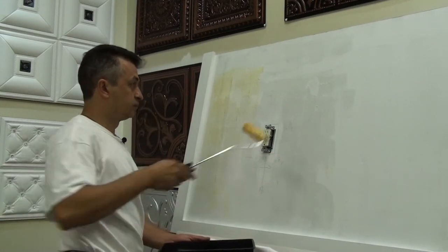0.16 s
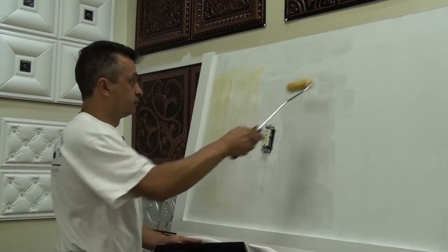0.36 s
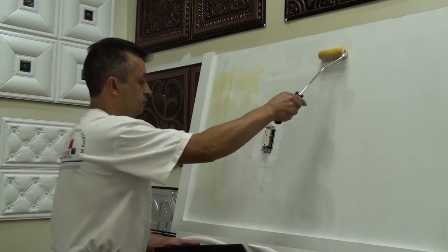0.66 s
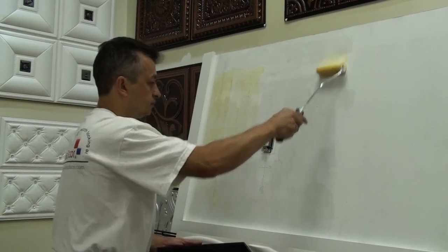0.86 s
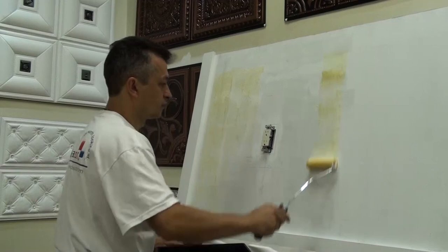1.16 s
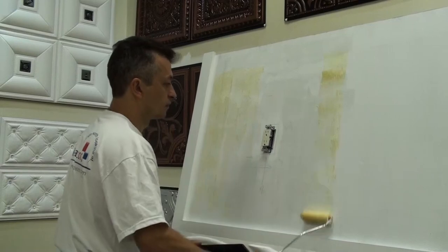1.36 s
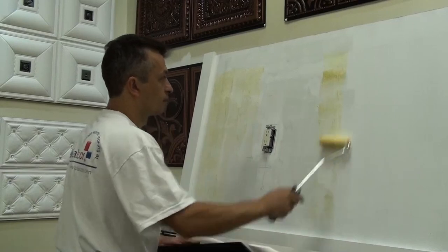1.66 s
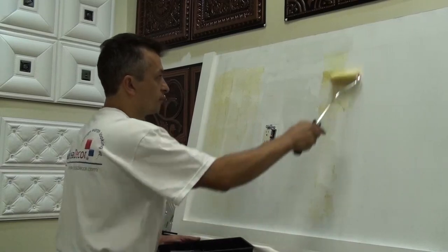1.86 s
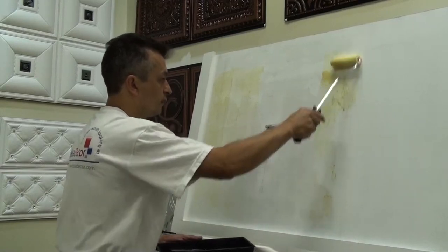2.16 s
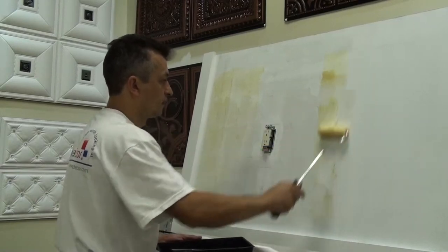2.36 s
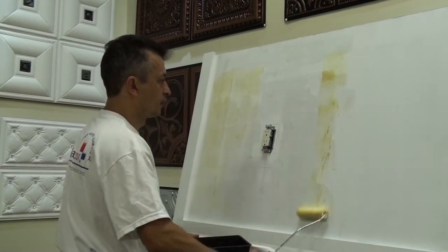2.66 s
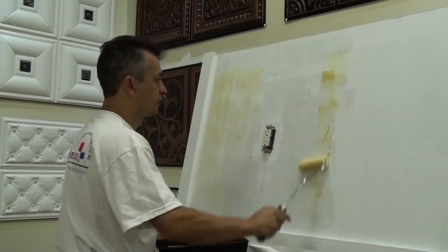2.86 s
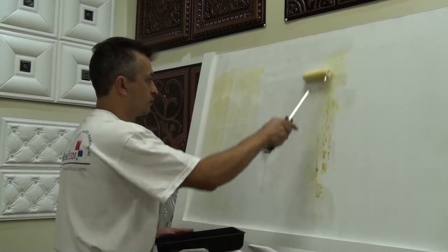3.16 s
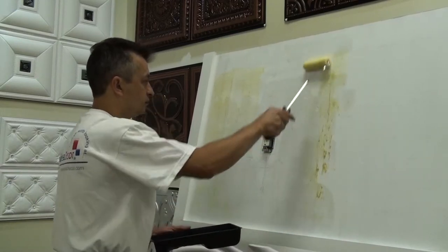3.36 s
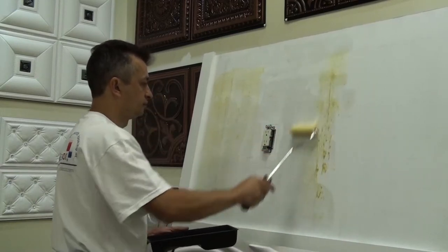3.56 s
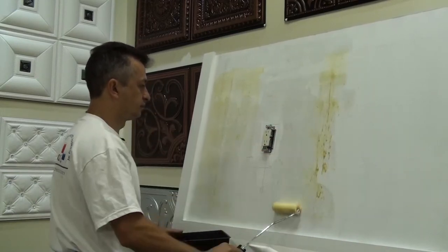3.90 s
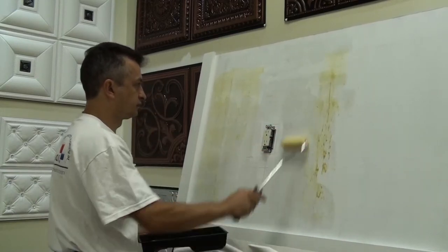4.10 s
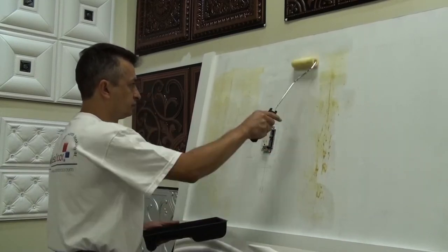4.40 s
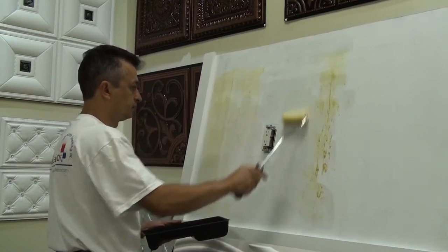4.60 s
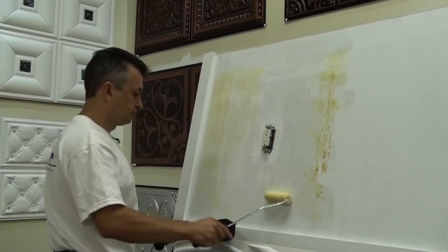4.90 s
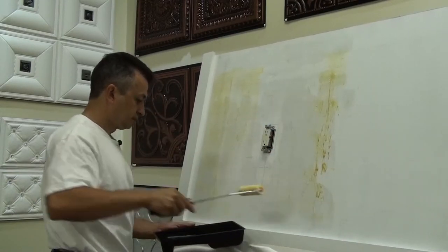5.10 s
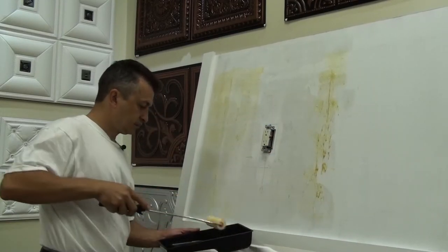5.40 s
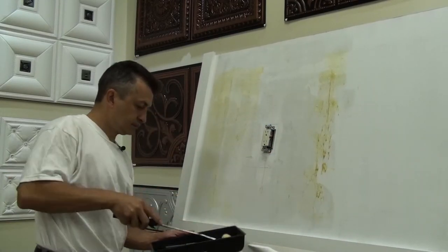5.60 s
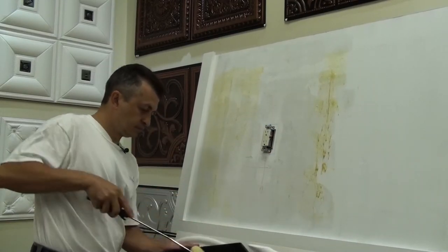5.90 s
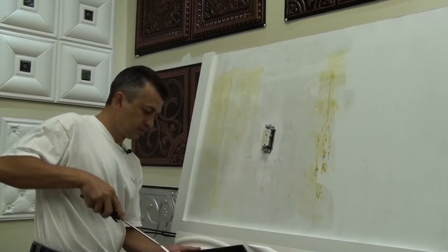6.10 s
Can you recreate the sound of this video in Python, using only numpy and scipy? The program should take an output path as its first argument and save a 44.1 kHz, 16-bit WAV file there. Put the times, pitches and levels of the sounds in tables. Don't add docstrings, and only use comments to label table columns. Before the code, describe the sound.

A foam roller spreads tacky glue up and down a hollow wall board, hissing, rattling and ticking, then knocks its tray over a low hum.

```python
import sys
import numpy as np
from scipy import signal
from scipy.fft import rfft, irfft
from scipy.io import wavfile

SR = 44100
rng = np.random.default_rng(int(sys.argv[2]) if len(sys.argv) > 2 else 0)


def amplitude_ratio(level_db):
    exponent = np.asarray(level_db, float) / 20
    return 10 ** exponent


def materialize(psi):
    bounded = np.clip(np.atleast_2d(psi).T, -1, 1)
    quanta = np.round(bounded * 32767).astype(np.int16)
    wavfile.write(sys.argv[1], SR, quanta)


N = 275625

# (f/Hz, width/Hz, level/dB)
BOARD = [(105.1, 6.3, -0.5), (141, 21, -1), (177, 25, -0.5), (206.2, 10.4, -6), (235, 36, -8),
         (297.8, 4, -20), (393, 44, -12), (458, 51, -20.5)]
# (t/s, board level/dB, core level/dB, rub level/dB, dying/(dB/s))
BUMPS = [(0.749, -50.5, -68, -93, 153.5), (1.014, -46, -46.5, -55, 106), (1.178, -66, -66, -75, 105),
         (1.762, -31.5, -43, -40.5, 124), (1.946, -37, -54, -59, 37), (2.341, -39, -47, -67, 94),
         (2.888, -39, -68, -45.5, 87), (3.0, -38, -48, -74, 71), (3.223, -40, -45, -67, 95),
         (3.463, -42.5, -46, -78, 80), (3.85, -39.5, -52, -59, 96), (4.191, -57, -44.5, -64, 140),
         (4.79, -41.5, -50.5, -48, 121), (4.996, -42.5, -50, -61.5, 197), (5.148, -37.5, -56.5, -58, 67)]
# (t/s, rattle level/dB, rub level/dB, dying/(dB/s))
TRAY = [
    (5.664, -66, -76, 280),
    (5.914, -89, -79, 500),
    (6.062, -82, -78, 348),
    (6.144, -72, -75, 500),
    (6.185, -59, -55, 402),
]


def rms_one(x):
    return x / np.sqrt(np.mean(x ** 2) + 1e-20)


def in_time(rows, outside=None):
    s, *columns = np.transpose(rows)
    return [np.interp(np.arange(N) / SR, s, c, outside, outside) for c in columns]


def drift(rate):
    r = np.exp(-80 * np.pi * rate / SR)
    noise = rng.standard_normal(N // 40 + 2002)
    slow = signal.lfilter([1], [1, -2 * r, r * r], noise)[2000:]
    return np.interp(np.arange(N) / 40, np.arange(len(slow)), rms_one(slow))


def ring(clicks, hz, t60):
    r, w = amplitude_ratio(-60 / (t60 * SR)), 2 * np.pi * hz / SR
    return signal.lfilter([0, np.sin(w)], [1, -2 * r * np.cos(w), r * r], clicks + 1e-18)


def colour(x, spectrum):
    hz, db = np.transpose(spectrum)
    grid = np.arange(1, len(x) // 2 + 2) * SR / len(x)
    gain = amplitude_ratio(np.interp(np.log(grid), np.log(hz), db))
    return rms_one(irfft(rfft(x) * gain, len(x)))


def grains(per_s, spread_db, clump_db, clump_rate):
    born = rng.random(N) < per_s * amplitude_ratio(clump_db * drift(clump_rate)) / SR
    size = amplitude_ratio(spread_db * np.minimum(rng.exponential(1, N), 5))
    return rms_one(born * size * rng.choice([-1, 1], N))


def body(modes, excite, flutter_db, flutter_rate):
    out = 0
    for hz, width, db in modes:
        voice = rms_one(ring(excite(), hz, np.log(1000) / np.pi / width))
        out = out + voice * amplitude_ratio(db + flutter_db * drift(flutter_rate))
    return rms_one(out)


def roller():
    rub, scuff = foam_rub()
    jolt = amplitude_ratio(.9 * drift(30))
    return jolt * (board_drum() + core_rattle() + scuff + ledge(rub + glue_hiss()))


def board_drum():
    law = (-44.5, 0, 1.1, 0.43, -0.33)
    s, db, _, _, dying = np.transpose(BUMPS)
    drum = body(BOARD, lambda: rng.standard_normal(N), flutter_db=2.0, flutter_rate=7)
    return drum * np.hypot(rolling(law), bursts(s, db, dying))


def core_rattle():
    # (f/Hz, width/Hz, level/dB)
    modes = [(780, 35, -39), (1034, 58, -3), (1200, 150, -1), (1400, 120, -1), (1705, 260, 2.5),
             (2100, 410, 0.5), (2900, 540, -10)]
    law = (-48, 0.76, 1.83, -0.52, -0.0463)
    s, _, db, _, dying = np.transpose(BUMPS)
    gain = np.hypot(rolling(law), bursts(s, db, 1.5 * dying))
    s, db, _, dying = np.transpose(TRAY)
    gain = gain + bursts(s, db, dying)
    rattle = body(modes, lambda: grains(900, spread_db=-3.0, clump_db=3.5, clump_rate=30),
                  flutter_db=2.0, flutter_rate=4.5)
    return gain * (0.91 * rattle + 0.58 * pops(500, low_hz=695, high_hz=2590, cycles=29))


def foam_rub():
    # (f/Hz, level/dB per Hz)
    rub_colour = [(1500, -53), (2400, -6), (3000, -5.5), (3600, -3.5), (4600, -6), (6000, -9), (7500, -13),
                  (9500, -12.5)]
    law = (-49, 0.67, 1.71, 1.45, 0.3063)
    s, _, _, db, dying = np.transpose(BUMPS)
    rub_gain = np.hypot(rolling(law), bursts(s, db, 1.74 * dying))
    s, _, db, dying = np.transpose(TRAY)
    scuff_gain = bursts(s, db, dying)
    rub = colour(grains(5000, spread_db=0.0, clump_db=6.0, clump_rate=16), rub_colour)
    rub = patches(rub, (2600, 3500, 4300, 5330, 6400, 7400), patchy_db=2.0, patch_rate=6.7)
    rub = .8 * rub + .55 * pops(600, low_hz=2500, high_hz=6800, cycles=50)
    rub = signal.lfilter(*signal.butter(3, 10500, fs=SR), rub)
    scuff = rms_one(signal.lfilter(*signal.butter(2, [3600, 7500], "band", fs=SR), rub))
    return rub * rub_gain, scuff * scuff_gain


def glue_hiss():
    # (f/Hz, level/dB per Hz)
    glue_colour = [(2940, -27), (5000, -6), (7160, 2.5), (12100, 5.5), (15100, 2), (15800, 0),
                   (16200, -37.5)]
    law = (-48.5, 1.24, 2, 2.3, 0.2462)
    # (t/s, tack level/dB)
    tack = [(.9, 14), (1.0, 10.5), (1.2, 5), (1.26, 1.5), (1.43, 6), (1.56, -1.5), (1.8, 1.5), (2.04, 2),
            (2.24, -4), (2.33, 1), (2.85, 0), (3.3, 0), (3.5, -4.5), (3.9, -4), (4.2, -7), (4.56, -23),
            (4.68, 6), (4.9, -20)]
    gain = rolling(law) * amplitude_ratio(in_time(tack)[0])
    glue = colour(grains(12000, spread_db=4.0, clump_db=2.0, clump_rate=45), glue_colour)
    glue = patches(glue, (6100, 6700, 7600, 10100, 11900, 14000, 16500), patchy_db=1.2, patch_rate=5)
    dull = rms_one(signal.lfilter(*signal.butter(4, 9500, fs=SR), glue))
    dries_from_s, dries_db_per_s = 3.4, 10.5
    dried_db = dries_db_per_s * np.maximum(np.arange(N) / SR - dries_from_s, 0)
    wet = np.clip((20 * np.log10(gain + 1e-9) - dried_db + 73.5) / 14, 0, 1)
    return gain * (wet * glue + (1 - wet) * dull)


def rolling(law):
    # (start/s, end/s, fastest at share of stroke (0-1), speed level/dB, pressure level/dB)
    strokes = [
        (0.796, 1.512, 0.57, -3.5, -2.5),
        (1.517, 2.115, 0.36, 1, 0),
        (2.048, 2.28, 0.57, -15, -5),
        (2.164, 2.776, 0.46, -0.5, 0),
        (2.761, 3.394, 0.39, -1.5, 0),
        (3.38, 4.016, 0.45, 1.5, -1.5),
        (3.986, 4.487, 0.32, -0.5, -1.5),
        (4.487, 5.05, 0.41, -2.5, -3.5),
    ]
    full_db, per_stroke, per_speed, per_pressure, onset = law
    cruise = 1.23
    t, power = np.arange(N) / SR, 0
    for start, end, fastest, speed_db, pressure_db in strokes:
        share = np.clip((t - start) / (end - start), 0, 1) ** (np.log(.5) / np.log(fastest))
        speed = np.tanh(cruise * np.sin(np.pi * share)) / np.tanh(cruise)
        start_up = abs(onset) * (share < .5)
        moving = np.clip((speed - start_up) / (1 - start_up), 0, 1) ** per_speed * (t < end)
        level = amplitude_ratio(full_db + per_stroke * speed_db + per_pressure * pressure_db)
        power = power + (level * moving) ** 2
    return np.sqrt(power)


def bursts(times, peaks_db, dying):
    rise_db_per_s = 707
    since = np.arange(N) / SR - times[:, None]
    slope = np.where(since < 0, rise_db_per_s * since, -dying[:, None] * since)
    return amplitude_ratio((peaks_db[:, None] + slope).max(axis=0))


def patches(x, edges_hz, patchy_db, patch_rate):
    spectrum, grid = rfft(x), np.arange(N // 2 + 1) * SR / N
    out = 0
    for row in np.eye(len(edges_hz)):
        share = np.interp(grid, edges_hz, row)
        out = out + irfft(spectrum * share, N) * amplitude_ratio(patchy_db * drift(patch_rate))
    return rms_one(out)


def pops(per_s, low_hz, high_hz, cycles):
    clicks = grains(per_s, spread_db=1.5, clump_db=4.5, clump_rate=9.8)
    dealt = rng.integers(0, 20, N)
    pitches = np.geomspace(low_hz, high_hz, 20)
    return rms_one(sum(ring(clicks * (dealt == k), hz, cycles / hz) for k, hz in enumerate(pitches)))


def ledge(x):
    # (t/s, lag/ms)
    lags = [(.9, 1.4), (1.22, .23), (1.55, .23), (1.75, .95), (2.05, 1.5), (2.25, 1.5), (2.72, .23),
            (2.82, .35), (3.03, 1.08), (3.2, 1.4), (3.4, 1.55), (3.8, .23), (4.08, .23), (4.42, 1.0),
            (4.55, .8), (4.85, .23)]
    near_db, loss_db_per_ms, cut_hz = -4, 7, 8000
    lag_ms, = in_time(lags)
    dull = signal.filtfilt(*signal.butter(2, cut_hz, fs=SR), x)
    echo = np.interp(np.arange(N) - lag_ms * SR / 1000, np.arange(N), dull)
    return x + amplitude_ratio(near_db - loss_db_per_ms * lag_ms) * echo


def rising_band():
    start_s, length_s, start_hz, rise_hz_per_s, level_db = 4.55, 0.26, 1584, 6600, -54
    since = np.arange(N) / SR - start_s
    hz = (start_hz + rise_hz_per_s * np.clip(since, 0, length_s)) * (1 + .035 * drift(30))
    swell = np.sin(np.pi * np.clip(since / length_s, 0, 1)) ** 0.23 * (since < length_s)
    tone = np.sin(2 * np.pi * np.cumsum(hz) / SR)
    return swell * amplitude_ratio(level_db + 6.2 * drift(49)) * drift(140) * tone


def knocks():
    # (t/s, peak level/dB, low ring f/Hz, high ring level/dB)
    core_knocks = [(0.401, -48.5, 1200, -2), (0.44, -52.5, 960, -19), (0.477, -49.5, 745, -6),
                   (0.493, -51.5, 1040, -5), (0.532, -46, 920, 3), (0.716, -49, 1130, -32),
                   (0.747, -37, 1170, -49), (0.901, -50, 744, -13), (0.943, -44, 800, -13),
                   (0.981, -40, 796, -22), (1.578, -60, 1200, -1), (1.946, -39.5, 1260, -1),
                   (2.105, -52, 1880, 13.5), (2.174, -37, 724, -12), (2.282, -37.5, 1120, -3),
                   (2.982, -32, 1120, 0), (4.126, -32, 1490, -22), (4.175, -38, 1128, -23),
                   (4.313, -29, 1180, -30), (4.42, -42.5, 1010, -35), (4.482, -49.5, 844, -17),
                   (4.564, -30.5, 1080, -30), (4.646, -27, 1095, -8), (4.715, -31, 1090, -12)]
    # (t/s, peak level/dB, low ring f/Hz, high ring level/dB, high ring f/Hz)
    tray_knocks = [(4.988, -31.5, 1530, -10, 4000), (5.005, -32.5, 1220, -11, 3900),
                   (5.193, -36, 1790, -7, 3500), (5.304, -51.5, 1270, -9, 2795),
                   (5.37, -53.5, 1200, -5, 2000), (5.647, -52, 1470, -27, 2460),
                   (5.657, -32.5, 1480, -46, 2180), (5.668, -35, 970, -9, 3470),
                   (5.687, -53.5, 1510, 1, 4040), (5.724, -41, 880, -35, 2370),
                   (5.86, -49, 1290, -6.5, 3270), (5.9, -56, 1270, -30, 2500),
                   (5.907, -36.5, 936, -11, 3940), (5.972, -59, 800, -26, 2300),
                   (6.064, -42, 970, -3, 3170), (6.142, -34, 930, -5.5, 4300),
                   (6.189, -36.5, 1590, 3.5, 6400)]
    core_high_hz = 2510
    out, length = np.zeros(N), 4000
    t = np.arange(length) / SR
    for s, db, low_hz, high_db, high_hz in [(*row, core_high_hz) for row in core_knocks] + list(tray_knocks):
        luck = rng.standard_normal(8)
        touch = np.eye(1, length)[0] + 0.62 * luck[7] * np.eye(1, length, 55)[0]
        touch += 0.053 * rng.standard_normal(length) * amplitude_ratio(-60 * t / 0.046)
        low = ring(touch, low_hz, .013) + .06 * ring(touch, low_hz, .07)
        for ratio, r in zip((.8, 1.2, 1.45), luck):
            low += .45 * ring(touch, low_hz * ratio * (1 + .04 * r), .008)
        high = ring(touch, high_hz, .009) + .07 * ring(touch, high_hz, 140 / high_hz)
        for ratio, r in zip((.68, .85, 1.2), luck[3:]):
            high += .5 * ring(touch, high_hz * ratio * (1 + .04 * r), .005)
        soft = signal.butter(3, [680, 0.99 * high_hz], "band", fs=SR, output="sos")
        knock = signal.sosfilt(soft, amplitude_ratio(db - 2.5) * (low + amplitude_ratio(high_db + 1.5) * high))
        i = round(s * SR)
        out[i:i + length] += knock[:N - i]
    return out


def ticks():
    # (t/s, peak level/dB, thump level/dB, rattle tail level/dB, handle ring
    # level/dB)
    clicks = [(1.7575, -22.5, -29, -21, -14.5), (1.8714, -28, -45, -26, -15),
              (2.0873, -33.5, -32, -12, -10.5), (2.609, -34, -63, -20, -14), (2.8744, -30.5, -51, -28, -11),
              (2.9171, -27, -50, -14.5, -34), (2.979, -23, -38, -16, -16), (3.2035, -33.5, -30.5, -11, -12),
              (3.269, -35, -54, -14, -27), (3.4431, -43.5, -34.5, -2.5, 3), (3.8407, -23, -36, -20, -22),
              (4.015, -44.5, -31, -3.5, -24), (5.1273, -32, -31, -9, -11), (5.3425, -57, -68, -18, -25),
              (5.668, -58, -35, -25, -9)]
    # (f/Hz, level/dB, 60 dB fall time/s)
    frame = [(3250, 0, .1), (3470, -5, .15), (5210, -8, .12), (5570, -6, .12), (7210, -4, .12),
             (8410, -9, .1), (8750, -8, .1), (8970, -10, .08)]
    # (f/Hz, level/dB per Hz)
    snap = [(400, -10), (750, -1.5), (1100, -2), (1900, -19), (2400, -7), (3400, -7.5), (4400, -17.5),
            (5500, -8), (6500, -17), (8800, -1.5), (11000, -18.5), (15500, -31)]
    handle_hz, handle_t60_s = 1860, .4
    out, length = np.zeros(N), 16000
    click, t = np.eye(1, length)[0], np.arange(length) / SR
    thump = sum(amplitude_ratio(db - 6.5) * ring(np.roll(click, 150), hz, 1.0 / width) for hz, width, db in BOARD)
    crack = sum(1.47 * ring(click, hz, 0.0006) for hz in (2960, 5650, 8650, 10800, 14800))
    handle = ring(click, handle_hz, handle_t60_s) - 0.99 * ring(click, handle_hz + 23, handle_t60_s)
    handle = handle * np.minimum(t / 0.079, 1)
    buzz = drift(43)
    for s, db, thump_db, tail_db, ring_db in clicks:
        i = round(s * SR)
        noise = colour(rng.standard_normal(length), snap)
        rattle = noise * (0.93 * amplitude_ratio(-60 * t / 0.0058) + amplitude_ratio(tail_db + 3.5 - 60 * t / 0.19))
        wire = 0
        for hz, mode_db, t60 in frame:
            wire = wire + amplitude_ratio(tail_db + mode_db - 5 + rng.normal(0, 4)) * ring(click, hz, t60)
        chatter = amplitude_ratio(ring_db + 3 + 0.73 * buzz[i:i + length]) * handle
        tick = amplitude_ratio(db - 8.5) * (crack + rattle + wire + chatter) + amplitude_ratio(thump_db) * thump
        out[i:i + length] += tick[:N - i]
    return out


def room(x):
    t60_s, wall_cut_hz = 0.32, 1000
    t = np.arange(SR // 2) / SR
    white = rng.standard_normal(len(t)) * (t > .004)
    dull = signal.lfilter(*signal.butter(1, wall_cut_hz, fs=SR), white)
    tail = dull * amplitude_ratio(-60 * t / t60_s) + (white - dull) * amplitude_ratio(-110 * t / t60_s)
    return signal.fftconvolve(x, tail / np.sqrt(np.sum(tail ** 2)))[:N]


def compressor():
    # (t/s, first multiple level/dB, second multiple level/dB)
    hum_levels = [(0.0, -35.5, -53), (0.4, -41.5, -45.5), (2.49, -36.5, -44.5), (2.56, -38.5, -70),
                  (2.71, -38, -48), (3.41, -40, -46), (3.66, -37.5, -41.5), (3.76, -40, -55), (4.63, -45.5, -44),
                  (4.7, -61, -58), (4.77, -43, -66), (4.96, -41, -62), (5.1, -40.5, -64), (5.19, -41.5, -43),
                  (6.04, -37.5, -49), (6.25, -38.5, -42)]
    # (multiple, phase/rad, level/dB)
    orders = [(3, 1.4, -61), (4, 0.94, -67)]
    shaft_hz = 29.5
    first_db, second_db = in_time(hum_levels)
    turn = -1.3 + 2 * np.pi * np.cumsum(shaft_hz + .2 * drift(.8)) / SR
    wave = amplitude_ratio(first_db) * np.sin(turn) + amplitude_ratio(second_db) * np.cos(2 * turn + 0.11)
    for k, phase, db in orders:
        wave = wave + amplitude_ratio(db) * np.sin(k * turn + phase)
    return np.sqrt(2) * wave


def air_noise():
    # (f/Hz, level/dB per Hz)
    air = [(12, -8), (20, -1.5), (45, -3.5), (75, -13), (110, -16), (150, -15.5), (200, -25.5),
           (250, -22.5), (300, -34.5), (420, -44.5), (620, -54), (790, -49.5), (1400, -57), (16000, -61)]
    return amplitude_ratio(-44.5) * colour(rng.standard_normal(N), air)


def scene():
    work = roller() + rising_band() + knocks() + ticks()
    room_db = -11
    return (work + amplitude_ratio(room_db) * room(work) + compressor() + air_noise())[None]


def band_limit(x):
    return signal.sosfilt(signal.butter(12, 16510, fs=SR, output="sos"), x)


def record(dry):
    cutoff_hz = 15830
    low_pass = signal.cheby2(14, 60, cutoff_hz * 1.02, fs=SR, output="sos")
    return band_limit(signal.sosfilt(low_pass, dry))


dry = scene()
out = record(dry)
materialize(out)
```